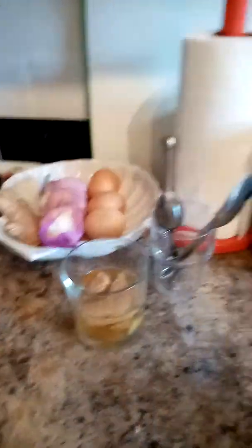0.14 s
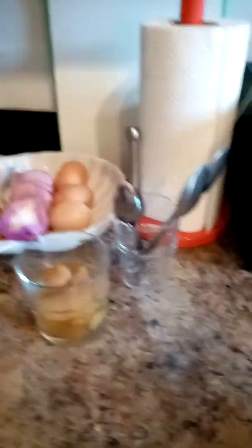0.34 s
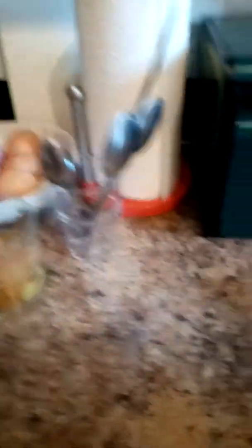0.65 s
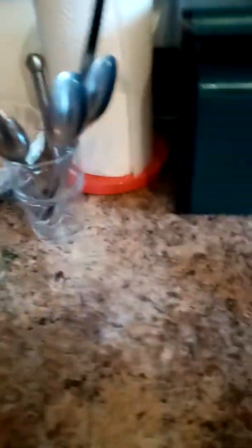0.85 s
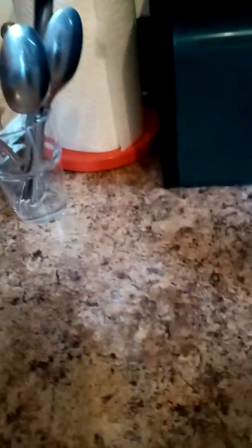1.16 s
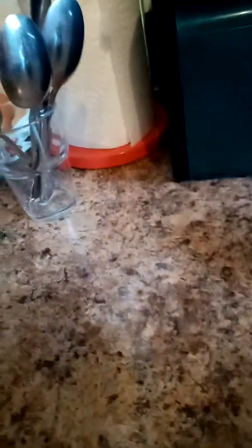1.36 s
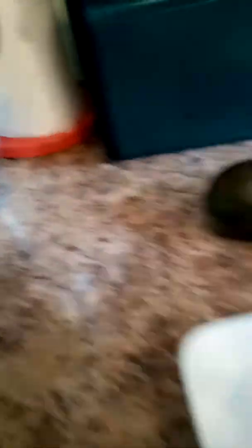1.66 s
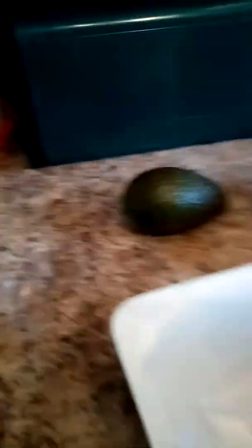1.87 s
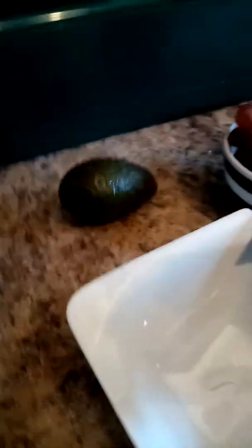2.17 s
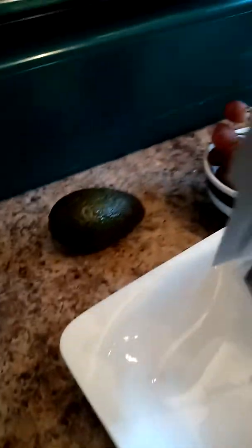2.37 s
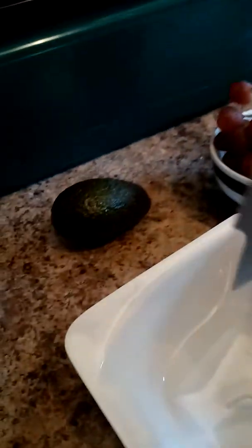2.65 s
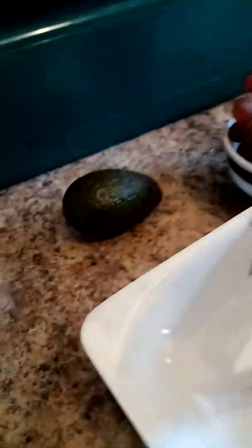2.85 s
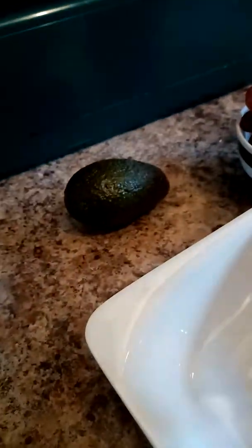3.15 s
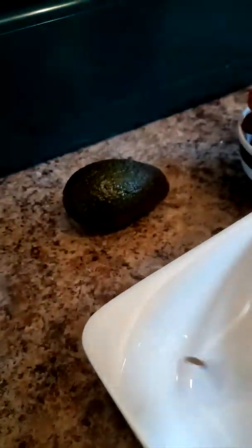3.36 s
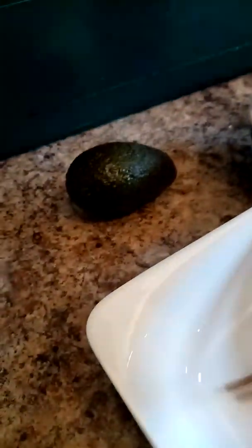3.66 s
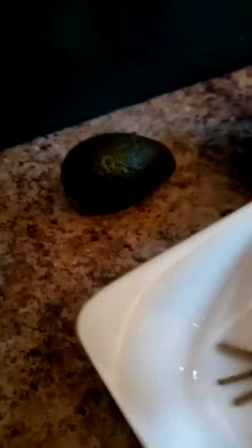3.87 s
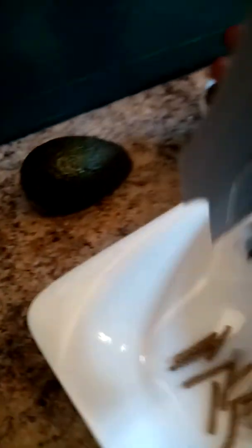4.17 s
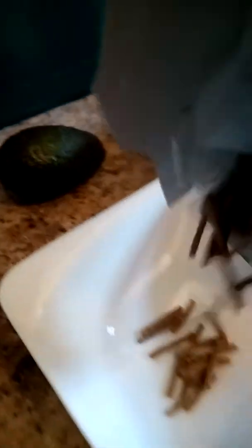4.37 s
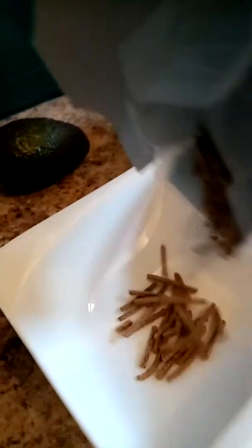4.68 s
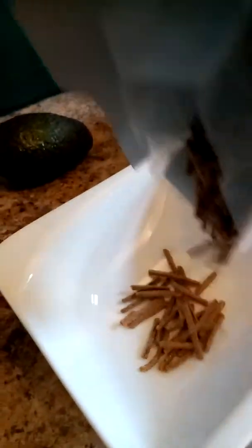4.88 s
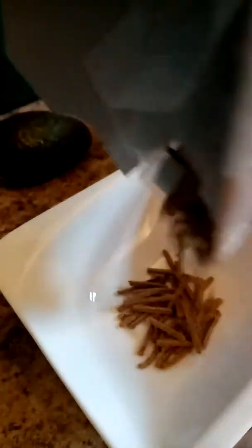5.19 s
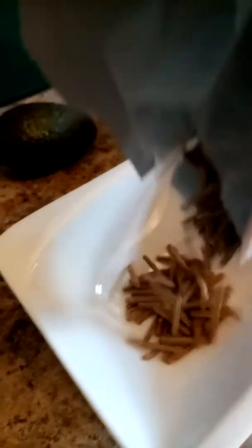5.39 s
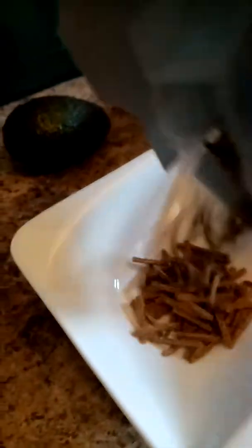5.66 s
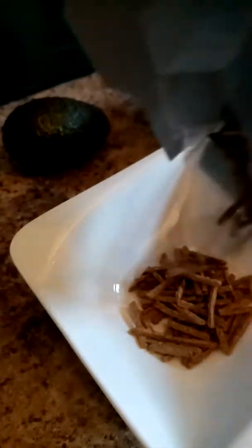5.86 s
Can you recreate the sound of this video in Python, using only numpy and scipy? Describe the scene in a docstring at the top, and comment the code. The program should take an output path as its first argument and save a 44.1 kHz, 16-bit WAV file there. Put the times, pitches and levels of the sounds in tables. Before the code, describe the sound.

A few faint, hollow taps open the first half second in a small, quiet kitchen. From about 0.6 seconds a plastic packet is lifted, crinkling finely with sharp snaps, swelling to a rounder pop near 1.3 seconds. The crinkle dies down around 2 seconds, leaving only small ticks. From about 2.6 seconds the packet is tipped and shaken: dense crackling and crisp snaps build up, with dry cereal sticks shuffling and thudding softly inside. At about 3.4 seconds the first sticks hit a ceramic bowl with light, high, briefly ringing clinks. These continue irregularly and grow fainter toward the end, while the louder crackle of the packet keeps surging in uneven shakes until about 6 seconds. Everything is close to a hand-held phone, with slight room reflections and a very faint hiss, appliance hum and whirr underneath.

```python
"""Small quiet kitchen: a plastic packet of dry cereal sticks is lifted, tipped and shaken over a bowl.
The film buckles in a fine crinkle, creases snap over, and the broad walls pop. The sticks shuffle
and thud inside; those that fall out ring the high modes of the ceramic bowl. A few faint taps come
first, and hiss, hum and whirr lie underneath. Heard close by, at the two ports of a hand-held phone."""
import sys
import numpy as np
from scipy import signal
from scipy.fft import rfft, irfft
from scipy.io import wavfile
from scipy.ndimage import uniform_filter1d

SR = 44100
rng = np.random.default_rng(int(sys.argv[2]) if len(sys.argv) > 2 else 0)


def file_out(sig):
    """Save sig as 16-bit WAV at sys.argv[1]."""
    # one column per channel
    cols = np.atleast_2d(sig).T
    # limit, then scale
    lim = np.clip(cols, -1, 1)
    pcm = np.round(lim * 32767).astype(np.int16)
    wavfile.write(sys.argv[1], SR, pcm)


N = 265771
TIME = np.arange(N) / SR
LOW_MODES_HZ, HIGH_MODES_HZ = 6000, 10500  # bowl: low modes below, high modes above

# spectrum of snapping film: (frequency [Hz], gain [dB])
SNAP_SPECTRUM = [(30, -9), (130, 9.5), (1000, -5), (2200, 1), (3400, -7.5), (4600, -2.5), (7000, -4),
                 (9500, -2), (11500, -13.5), (13500, -22), (15000, -11.5)]
# bowl modes: (frequency [Hz], level [dB])
BOWL_MODES = [(3381, -24), (4000, -4.5), (4985, -19), (7372, -6), (7709, -6.5), (8185, 1), (8210, -11),
              (8662, -3), (9108, -2), (9550, -7), (9815, -7.5), (11055, -12.5), (11266, -10),
              (11991, -11.5), (13265, -17), (13527, -23), (14573, -30)]


def crinkle(level_db, fine_db, rate_per_s=1800, spread_db=5.5, q=1.64, fine_hz=9000):
    """Tiny film buckles and brittle stick contacts, each ringing its own mix of short resonances."""
    # crinkle spectra, packet upright and tipped: (frequency [Hz], gain [dB])
    upright = [(410, -34), (700, -7), (757, -4.5), (1090, -9.5), (1710, -1), (2270, 2.5), (2990, -1),
               (4430, 6), (6480, 4.5), (7790, -2), (9600, -0.5), (12500, -26), (13700, -15), (15000, -15.5),
               (16000, -15)]
    tipped = [(410, -26.5), (700, -8.5), (958, -14), (1090, -11), (1360, -11.5), (2270, -3.5), (3460, -8.5),
              (5120, -4.5), (6570, -3.5), (7790, -10.5), (9230, -8), (10800, -21), (13300, -31.5),
              (15000, -20), (16000, -26)]
    buckles = clicks(rate_per_s, spread_db)
    rings = sum(band(buckles * rng.standard_normal(N), hz, q) / np.sqrt(hz)
                for hz in np.geomspace(700, 15000, num=12))
    sound = tilt_colour(rings, upright, tipped)
    top = signal.sosfiltfilt(signal.butter(2, fine_hz, "high", fs=SR, output="sos"), sound)
    return (sound + top * (undb(fine_db - level_db) - 1)) * undb(level_db)  # top follows fine_db


def crease_snaps(q=1.73, burst_s=0.0018, edge=2.16, edge_s=.0007, rattle_t60_s=0.048, size=2000):
    """A crease flips: a burst with one sharp edge rings the film, a crack on top; some rattle on."""
    # snaps: (time [s], level [dB], centre [Hz], crack gain [dB], rattle [0-1])
    snaps = [(0.084, -47.5, 3600, -16, .25), (.452, -60, 5200, -3, .3), (0.5948, -35, 5100, 6, 0.5),
             (.608, -39, 4830, -3, 0.26), (0.915, -39, 4300, -14, 0.24), (0.9598, -26, 6600, -3, 0.14),
             (1.021, -35.5, 3980, -12, 0.5), (1.0824, -34, 4600, -11, 0), (1.1296, -29, 4480, 4, 0.33),
             (1.1524, -27, 6200, 10, 0.2), (1.245, -29, 4070, -8, 0.4), (1.258, -32, 6000, -6, 0),
             (1.3147, -25, 5000, -14, 0.05), (1.354, -26, 5800, -15, 0.11), (1.387, -22.5, 5500, -6, .2),
             (1.4, -29, 6500, -6, 0.2), (1.435, -27.5, 6000, -8, 0.2), (1.556, -29.5, 5360, -14, 0),
             (1.7688, -28.5, 5760, -8, 0), (1.798, -26.5, 5670, -11, 0), (2.0365, -38, 5800, -14, 0.2),
             (2.243, -51, 4000, -14, 0.37), (2.4026, -51.5, 4600, -15, 0.4), (2.8865, -32.5, 6000, 1, 0.2),
             (3.0215, -22, 5270, -5, 0.14), (3.0733, -27.5, 4800, -4, 0.4), (3.091, -29, 4970, -15, 0.1),
             (3.2208, -20.5, 5500, -8, 0.05), (3.2378, -20.5, 5260, 0, 0.26), (3.2746, -20, 6400, 10, 0.4),
             (3.4097, -19, 5700, -1, 0.15), (3.422, -25, 5940, -8, 0), (3.424, -26, 5940, -1, .1),
             (3.447, -28.5, 5200, -12, 0.5), (3.48, -25.5, 7000, -3, .1), (3.7877, -26, 5800, 3, 0),
             (3.819, -28, 6000, -6, 0), (3.835, -26.5, 8700, -10, 0), (3.866, -21, 5150, -9, 0.4),
             (3.9024, -16.5, 6600, 4, 0), (3.969, -33, 7000, -5, 0), (4.005, -33, 6200, -3, 0),
             (4.061, -21.5, 6200, -6, 0), (4.073, -29, 6500, -7, 0), (4.178, -27, 7000, -9, 0.05),
             (4.2843, -24.5, 6560, -7, 0), (4.3697, -17, 6150, 7, 0), (4.4, -25.5, 6000, -4, 0.5),
             (4.4698, -15, 6000, 3, 0.27), (4.479, -27, 7370, -2, 0.5), (4.549, -19.5, 7800, 8, 0),
             (4.573, -22, 6700, 2, 0.1), (4.5855, -25, 6200, -3, .1), (4.671, -22.5, 6900, -7, 0.1),
             (4.74, -19.5, 6600, -2, 0.18), (4.782, -25.5, 5330, -5, 0), (4.943, -33, 7000, 3, 0.1),
             (4.9725, -14.5, 5590, 5, 0.2), (4.981, -21, 6040, 0, 0), (5.0235, -22.5, 5500, -8, 0),
             (5.0513, -21.5, 7500, 0, 0.1), (5.0595, -25, 5570, -9, 0.1), (5.1125, -25, 6000, -6, 0),
             (5.177, -23, 5470, -8, 0), (5.184, -17, 5940, -9, 0), (5.257, -21, 5900, 1, 0.4),
             (5.5408, -18.5, 5700, -14, 0.05), (5.5707, -23.5, 5820, -14, 0), (5.6073, -19, 6900, 0, 0),
             (5.6433, -33, 7480, -5, 0), (5.682, -27, 5900, -7, 0), (5.717, -29, 6500, -5, 0),
             (5.7263, -14.5, 5300, 2, 0.2), (5.7424, -21, 5500, -6, 0.1), (5.8173, -26, 5700, -16, 0),
             (6.006, -18, 5500, -8, 0)]
    track, t = np.zeros(N), np.arange(size) / SR
    flip = t / burst_s * np.exp(-(t / burst_s) ** 2)
    for s, db, hz, crack_db, rattle in snaps:
        burst = rng.choice([-1, 1], size) * np.hypot(flip, rattle * fade(t, rattle_t60_s))
        burst[int(edge_s * SR)] = edge
        ring = band(band(burst, hz, q), hz, q / 2)
        body_db = -10.5 - 74 * np.log2(hz / 5500)  # broader crease: lower, more body
        body = undb(body_db) * band(burst, hz=1860, q=0.39)
        crack = undb(crack_db) * band(burst, hz=12500, q=0.84)
        sound = ring + body + crack
        add(track, s, undb(db) * sound / np.std(sound[:132]))  # level of the first 3 ms
    return colour(track, SNAP_SPECTRUM)


def crease_ticks(fine_db, offset_db=-8, rate_per_s=55, spread_db=3.0, t60_s=0.0049, size=400):
    """Small creases give way at random: dry ticks that follow the finest crackle."""
    decay = fade(np.arange(size) / SR, t60_s)
    bursts = signal.fftconvolve(clicks(rate_per_s, spread_db), decay)[:N] * rng.standard_normal(N)
    ticks = colour(band(bursts, hz=11000, q=1.07), SNAP_SPECTRUM)
    return unit(ticks) * undb(fine_db + offset_db)


def wall_pops(q=1.0, rise_s=0.00045, size=6000):
    """A whole packet wall flexes, lower and rounder than a crease."""
    # pops: (time [s], level [dB], centre [Hz], t60 [s])
    pops = [(.004, -39, 1470, 0.054), (0.084, -45.5, 1710, 0.045), (.185, -54, 2300, .03),
            (0.344, -49.5, 1780, .02), (0.571, -41, 1900, 0.022), (0.706, -41, 1600, .015),
            (0.74, -42, 1870, 0.033), (0.953, -35, 1360, 0.018), (1.103, -29, 1580, 0.017),
            (1.328, -17.5, 1680, .02), (2.104, -51, 1720, .02), (2.241, -50, 1900, .04),
            (2.401, -51, 1200, .04), (2.826, -34, 1400, 0.11), (2.865, -37, 1800, .06),
            (3.003, -27, 2040, .015), (3.086, -32.5, 1300, .03), (3.333, -32, 990, 0.018),
            (4.468, -35, 1650, .02), (5.727, -37, 538, .02)]
    track, t = np.zeros(N), np.arange(size) / SR
    for s, db, hz, t60_s in pops:
        burst = rng.choice([-1, 1], size) * fade(t, t60_s) * rise(t, rise_s)
        sound = band(band(burst, hz, q), hz, q)
        add(track, s, undb(db) * sound / np.abs(sound).max())
    return track


def handling(easy_db=-50):
    """Hand effort and jolts set the levels [dB] of crinkle, finest crackle and shuffle."""
    # effort while lifting, then pouring: (time [s], level [dB])
    lift = [(0, -58), (.06, -80), (.13, -81.5), (.53, -85), (.6, -67.5), (.78, -64.5), (.89, -68.5),
            (1.02, -53.5), (1.29, -50), (1.34, -43), (1.42, -44.5), (1.62, -50.5), (1.93, -53), (2.07, -75),
            (2.38, -85.5)]
    pour = [(2.54, -67.5), (2.76, -56), (2.81, -56), (2.835, -52), (2.95, -54.5), (3.06, -47),
            (3.45, -46.5), (3.54, -59.5), (3.68, -53.5), (3.93, -45.5), (4.23, -49.5), (4.62, -50),
            (4.82, -57), (4.885, -55.5), (4.925, -65.5), (4.962, -56), (4.99, -53), (5.06, -47.5),
            (5.25, -48), (5.48, -53.5), (5.59, -50), (5.85, -52.5), (5.97, -57)]
    effort_db, slump = np.interp(TIME, *np.transpose(lift + pour)), slumps()
    extra_db = effort_db - easy_db
    jolt_crinkle = undb(5 + 0.64 * extra_db) * slump  # taut film crinkles more
    crinkle_db = 20 * np.log10(np.hypot(undb(effort_db), jolt_crinkle))
    heap_db = 4.5 * np.maximum(TIME - 3.39, 0)  # sticks begin to land on sticks
    fine_db = effort_db + 6 + 0.63 * extra_db + heap_db
    shifting_db = np.interp(tilt(), [0, 1], [-55.5, -57]) + 0.89 * extra_db
    shuffle_db = 20 * np.log10(np.hypot(undb(shifting_db), slump))
    return crinkle_db, fine_db, shuffle_db


def slumps(rise_s=0.01, t60_s=0.032):
    """Gain over time: at each jolt the contents slump, slide briefly and settle."""
    # wrist jolts: (time [s], level [dB], slide length [s])
    jolts = [(0, -61.5, 0.01), (0.094, -77, 0.012), (.575, -60, 0.044), (.74, -61.5, 0.052),
             (2.103, -64.5, 0.0074), (2.243, -60, 0.0094), (2.405, -63.5, 0.12), (2.696, -55.5, 0.019),
             (2.825, -55, 0.048), (3.04, -58.5, 0.053), (3.33, -51.5, 0.0083), (3.44, -62, 0.042),
             (3.72, -54.5, 0.081), (3.815, -47, 0.0085), (3.87, -49, 0.014), (3.95, -52.5, 0.065),
             (4.063, -44, 0.011), (4.184, -51, 0.024), (4.291, -50, 0.03), (4.371, -53, 0.042),
             (4.462, -48, 0.037), (4.55, -51.5, 0.032), (4.649, -49.5, 0.03), (4.77, -56.5, 0.025),
             (4.972, -49, 0.07), (5.057, -49, 0.061), (5.15, -51, 0.028), (5.548, -50.5, 0.03),
             (5.616, -50.5, 0.034), (5.725, -45, 0.0094), (5.796, -54.5, 0.023), (6.003, -47.5, 0.024)]
    power = 0
    for s, db, slide_s in jolts:
        attack = np.clip((TIME - s) / rise_s + .5, 0, 1)
        decay = fade(np.maximum(TIME - s - slide_s, 0), t60_s)
        power += (undb(db) * attack * decay) ** 2
    return np.sqrt(power)


def tilt(start_s=2.17, length_s=0.39):
    """Packet tilt: 0 upright, 1 mouth over the bowl."""
    return np.clip((TIME - start_s) / length_s, 0, 1)


def tilt_colour(x, upright, tipped):
    """The spectrum crossfades as the packet tips; running rms held near 1."""
    sound = (1 - tilt()) * colour(x, upright) + tilt() * colour(x, tipped)
    running_power = uniform_filter1d(sound ** 2, size=3000)
    return sound / np.sqrt(running_power + 1e-4 * np.mean(sound ** 2))


def bowl_strikes(favoured_db=6, missed_db=-13):
    """Light hard sticks hit bare china; each contact point favours one mode and is a node of another."""
    # strikes: (time [s], level [dB], low modes [dB], high modes [dB], favoured [Hz], missed [Hz])
    strikes = [(3.431, -26.5, 3, 7, 9550, 11266), (3.447, -35, 13, -6, 3381, 4000),
               (3.5397, -31.5, 0, -4, 8662, 9550), (3.5627, -26.5, -3, 0, 8662, 9108),
               (3.6174, -35, 10, 0, 7372, 8662), (3.661, -28, 1.5, -7, 8185, 11055),
               (3.6907, -34, 4, 4, 8185, 9550), (3.756, -39, -9, -2, 8185, 9108),
               (4.0312, -26, -6, -8, 8185, 8662), (4.0824, -34, -6, 6, 9108, 8185),
               (4.1306, -32.5, -8, -7, 9550, 7709), (4.42, -39, -9, 1, 9108, 9550),
               (4.49, -34, 2, 1, 9108, 8662), (4.584, -31.5, -5.5, 1, 9550, 9108),
               (4.635, -35, -4, -6, 9815, 9550), (4.854, -37, -9, -9, 7372, 8185),
               (4.888, -49, -7, -3, 9108, 8185), (4.997, -41, -7, -4, 7372, 8662),
               (5.32, -43, -9, -8, 8185, 9108), (5.366, -37.5, -7, -2, 9815, 9550)]
    track = np.zeros(N)
    hz, mode_db = np.transpose(BOWL_MODES)
    for s, db, low_db, high_db, favoured_hz, missed_hz in strikes:
        weights_db = mode_db + (hz < LOW_MODES_HZ) * low_db + (hz > HIGH_MODES_HZ) * high_db
        weights_db[np.argmin(np.abs(hz - favoured_hz))] += favoured_db
        weights_db[np.argmin(np.abs(hz - missed_hz))] += missed_db
        add(track, s, undb(db) * stick_landing(weights_db))
    return track


def bowl_grazes(start_s=3.78, end_s=5.9, count=26, level_db=-46, spread_db=3, low_db=-9, place_db=5):
    """Faint glancing touches all over the bowl, each with its own mix of modes."""
    track = np.zeros(N)
    hz, mode_db = np.transpose(BOWL_MODES)
    for s in start_s + (end_s - start_s) * (np.arange(count) + rng.random(count)) / count:
        weights_db = mode_db + (hz < LOW_MODES_HZ) * low_db + place_db * rng.standard_normal(len(hz))
        add(track, s, undb(level_db + spread_db * rng.standard_normal()) * stick_landing(weights_db))
    return track


def stick_landing(mode_db, median_t60_s=0.14, place_db=2, chatter_db=-17, clack_db=-11, size=9000):
    """The china rings, lower modes longer; the stick clacks and chatters on the glaze."""
    t, hz = np.arange(size) / SR, np.transpose(BOWL_MODES)[0]
    weights = undb(mode_db + place_db * rng.standard_normal(len(hz))) * rng.choice([-1, 1], len(hz))
    damping = np.sqrt(hz / np.median(hz))[:, None]
    modes = np.sin(2 * np.pi * hz[:, None] * t) * fade(t * damping, median_t60_s)
    ring = weights @ modes / np.linalg.norm(weights)
    chatter = band_noise(size, hz=9000, q1=2.5, q2=1) * fade(t, t60_s=.12)
    stick_hz = 5200 * rng.uniform(.8, 1.25)
    clack = band_noise(size, stick_hz, q1=1.6, q2=0.81) * fade(t, t60_s=0.042)
    return (ring + undb(chatter_db) * chatter + undb(clack_db) * clack) * rise(t, rise_s=.0003)


def stick_shuffle(level_db, rate_per_s=1400, spread_db=3):
    """The mass of sticks bumps softly against the slack packet walls."""
    # shuffle spectra, packet upright and tipped: (frequency [Hz], gain [dB])
    upright = [(18, -54), (30, -41), (102, -10), (167, -2), (287, -3), (327, -5.5), (392, 1), (493, -3.5),
               (630, 0), (754, -13.5), (1100, -7.5), (1500, -10), (1950, -44), (3300, -120)]
    tipped = [(18, -71), (30, -55), (86, -7.5), (236, -1), (462, -5), (673, -1), (767, -17.5), (846, -1),
              (918, -15), (1100, -7), (1360, -19.5), (1500, -11.5), (1950, -12.5), (3300, -120)]
    return tilt_colour(clicks(rate_per_s, spread_db), upright, tipped) * undb(level_db)


def clump_thuds(t60_s=.075, rise_s=.004, roughness=0.435, q=1.3, size=7000):
    """A clump lands: the air in the packet gives a few low cycles, roughened by single sticks."""
    # thuds: (time [s], level [dB], pitch [Hz])
    thuds = [(.005, -54, 320), (.112, -64, 300), (2.44, -55, 169.8), (2.825, -45, 215), (3.331, -40.5, 210),
             (3.805, -48, 109), (3.868, -44, 306), (4.083, -42.5, 172), (4.185, -45, 205),
             (4.296, -48, 270), (4.376, -40, 267), (4.468, -39.5, 344), (4.494, -45, 235),
             (4.557, -38, 230), (4.649, -44, 220), (4.975, -39, 250), (5.058, -42, 277), (5.158, -43, 330),
             (5.553, -42.5, 265), (5.728, -41.5, 193), (5.906, -46.5, 230)]
    track, t = np.zeros(N), np.arange(size) / SR
    for s, db, hz in thuds:
        jostle = roughness * band_noise(size, hz, q, q)
        sound = (np.sin(2 * np.pi * hz * t) + jostle) * fade(t, t60_s) * rise(t, rise_s)
        add(track, s, undb(db) * sound / np.abs(sound).max())
    return track


def hollow_taps(t60_s=0.033, rise_s=.001, size=4000):
    """Light touches on something hollow before the lift; each rings the same modes."""
    # taps: (time [s], level [dB])
    taps = [(0.099, -50), (.288, -61), (0.33, -58), (0.344, -62), (.393, -52.5), (0.405, -58)]
    # hollow body modes: (frequency [Hz], level [dB])
    modes = [(935, -4.5), (1040, 4), (1157, -6), (1960, -5)]
    track, t = np.zeros(N), np.arange(size) / SR
    ring = sum(undb(db) * np.sin(2 * np.pi * hz * t) for hz, db in modes)
    ring *= fade(t, t60_s) * rise(t, rise_s)
    for s, db in taps:
        add(track, s, undb(db) * ring / np.abs(ring).max())
    return track


def kitchen(x, near_db, room_db, correlation=0.0043, near_t60_s=0.026, room_t60_s=0.52, hop=1500):
    """Direct sound, counter and bowl reflections, then the room; paths vary as packet and phone move."""
    # phone swinging towards the bowl: (time [s], right port delay [s])
    port_lag = [(0, .00095), (1.5, .0008), (3, .00066), (6, .0005)]
    size = 8000
    t, stereo = np.arange(size) / SR, np.zeros((2, N))
    near = fade(t, near_t60_s) * (t > .0004)
    far = fade(t, room_t60_s) * (t > .006)
    echoes = np.hypot(undb(near_db) * unit(near), undb(room_db) * unit(far)) / np.sqrt(size)
    window, padded = signal.get_window("hann", 2 * hop), np.pad(x, (0, 2 * hop))
    for start in range(0, N, hop):
        piece = padded[start:start + 2 * hop] * window
        if start == 0:
            piece[:hop] = x[:hop]
        if np.abs(piece).max() > 1e-6:
            paths = echoes * rng.standard_normal((2, size))
            paths[1] = correlation * paths[0] + np.sqrt(1 - correlation ** 2) * paths[1]
            paths[:, 0] = 1  # direct sound
            left, right = signal.fftconvolve(piece[None], paths, axes=1)
            s = start / SR
            add(stereo[0], s, left)
            add(stereo[1], s + np.interp(s, *np.transpose(port_lag)), right)
    return stereo / np.sqrt(1 + np.sum(echoes ** 2))


def room_tone(hiss_db=-79, hum_hz=98.4, hum_db=-86.5, whirr_db=-78, waver_per_s=14):
    """House hiss, partly common to both ports, plus an appliance's steady hum and wavering whirr."""
    # hiss spectrum: (frequency [Hz], gain [dB])
    spectrum = [(15, -27), (25, -7), (44, -26), (73, -9), (103, 4), (150, 4.5), (219, 4.5), (300, -4),
                (440, -10), (879, -27), (1750, 3), (2300, -15), (2780, -12), (6900, -14.5), (9520, -14),
                (13500, -37), (15000, -29)]
    common, left, right = (unit(colour(rng.standard_normal(N), spectrum)) for _ in range(3))
    hiss = common + undb(-2) * np.array([left, right])
    hum = np.sqrt(2) * np.sin(2 * np.pi * hum_hz * TIME)
    waver_db = np.interp(TIME * waver_per_s, np.arange(N), rng.uniform(-4, 4, N))
    whirr = band_noise((2, N), hz=2030, q1=9, q2=4.5)
    return undb(hiss_db) * hiss + undb(hum_db) * hum + undb(whirr_db + waver_db) * whirr


def undb(db):
    """Decibels to gain."""
    return 10 ** (np.asarray(db) / 20)


def unit(x):
    """Scale to rms 1."""
    return x / np.sqrt(np.mean(x ** 2))


def rise(t, rise_s):
    """Exponential attack from 0 to 1."""
    return 1 - np.exp(-t / rise_s)


def fade(t, t60_s):
    """Exponential decay, 60 dB down at t60_s."""
    return np.exp(-np.log(1000) * t / t60_s)


def band(x, hz, q):
    """One resonance, gain 1 at its centre."""
    return signal.lfilter(*signal.iirpeak(hz, max(q, hz / SR * 3), fs=SR), x)


def band_noise(shape, hz, q1, q2):
    """Noise through two resonances in series; rms 1."""
    return unit(band(band(rng.standard_normal(shape), hz, q1), hz, q2))


def colour(x, points, size=4096):
    """Minimum-phase filter through (frequency [Hz], gain [dB]) points."""
    hz, db = np.transpose(points)
    grid_hz = np.maximum(np.arange(size // 2 + 1) * SR / size, 1)
    gain = undb(np.interp(np.log(grid_hz), np.log(hz), db))
    cepstrum = irfft(np.log(gain))
    cepstrum[1:size // 2] *= 2
    cepstrum[size // 2 + 1:] = 0
    return signal.fftconvolve(x, irfft(np.exp(rfft(cepstrum))))[:N]


def clicks(rate_per_s, spread_db):
    """Random clicks of either sign, many small, a few large."""
    sizes = undb(spread_db * np.minimum(rng.standard_normal(N), 2))
    return (rng.random(N) < rate_per_s / SR) * sizes * rng.choice([-1, 1], N)


def add(track, time_s, sound):
    """Mix a short sound into a track."""
    start = int(time_s * SR)
    track[start:start + len(sound)] += sound[:N - start]


def scene():
    """Packet, contents and bowl in the kitchen."""
    crinkle_db, fine_db, shuffle_db = handling()
    film = undb(5) * kitchen(crinkle(crinkle_db, fine_db), near_db=11.5, room_db=6.5)
    contents = undb(3.5) * kitchen(stick_shuffle(shuffle_db), near_db=-1, room_db=-1, correlation=0.28)
    creases = undb(-3.5) * kitchen(crease_snaps() + crease_ticks(fine_db), near_db=-4, room_db=-9)
    walls = undb(-2) * kitchen(wall_pops() + hollow_taps() + clump_thuds(), near_db=-6, room_db=-7)
    china = undb(0.5) * kitchen(bowl_strikes() + bowl_grazes(), near_db=-9, room_db=-16, hop=3000)
    return film + contents + creases + walls + china + room_tone()


def record(dry, cutoff_hz=15750):
    """Right port brighter and fuller, left stronger in the presence range; top cut."""
    # port balance: (frequency [Hz], left minus right [dB])
    balance = [(40, -10), (120, -8), (300, -5), (650, -7), (1300, -3), (2100, 4), (3200, -1), (4700, 4),
               (6500, 1), (8200, -3), (9500, -9), (11000, -6), (12500, -12), (15000, -14)]
    ports = [colour(x, [(hz, side * db / 2) for hz, db in balance]) for x, side in zip(dry, (1, -1))]
    return signal.sosfilt(signal.ellip(10, .2, 80, cutoff_hz, fs=SR, output="sos"), ports)


dry = scene()
out = record(dry)
file_out(out)
```